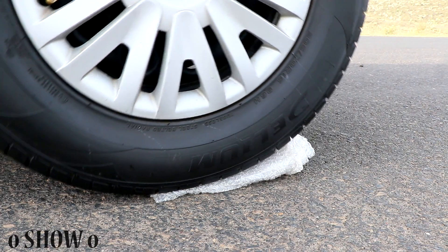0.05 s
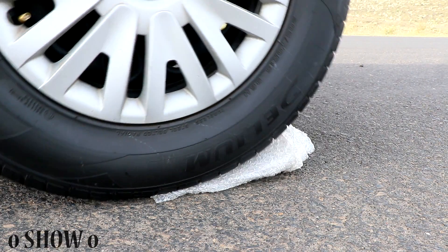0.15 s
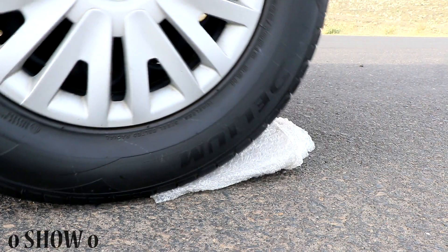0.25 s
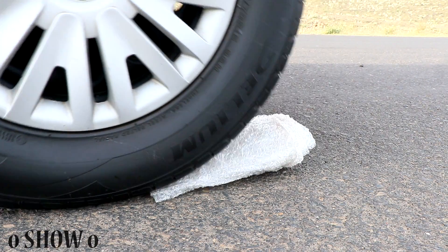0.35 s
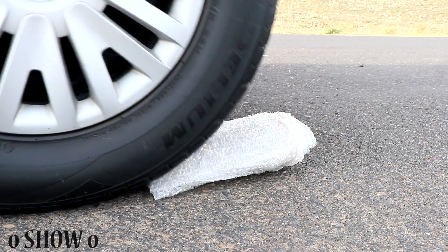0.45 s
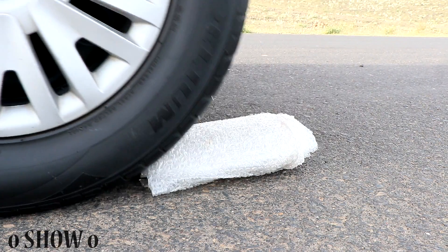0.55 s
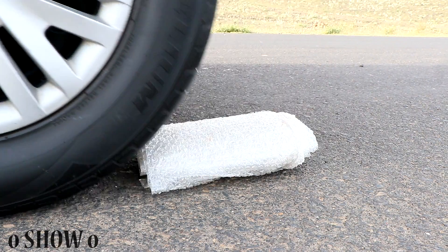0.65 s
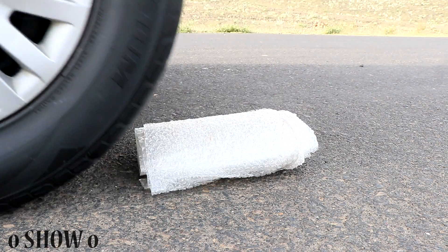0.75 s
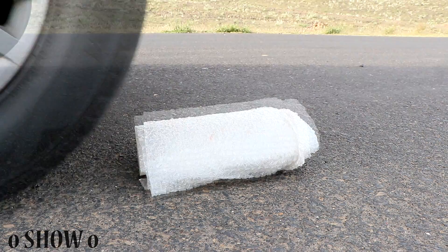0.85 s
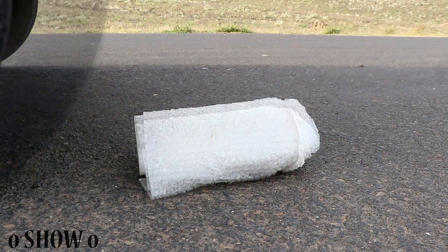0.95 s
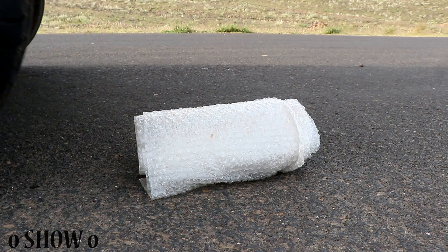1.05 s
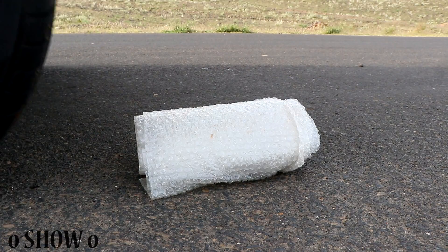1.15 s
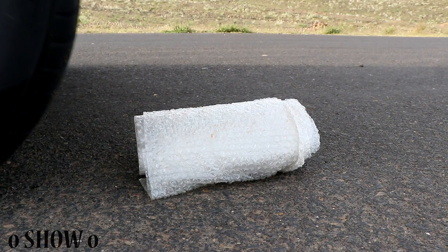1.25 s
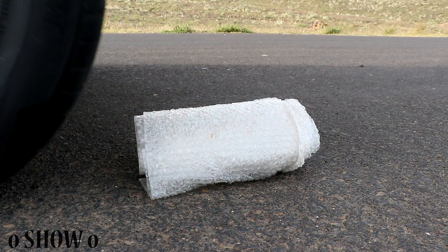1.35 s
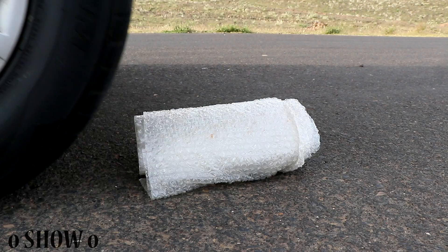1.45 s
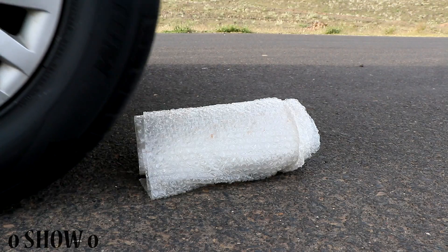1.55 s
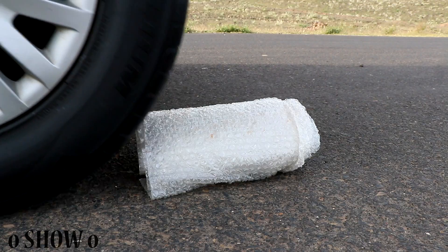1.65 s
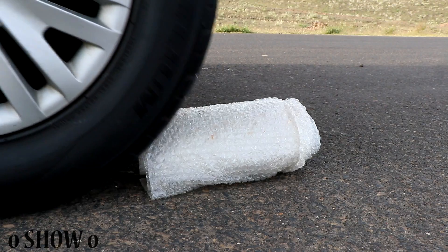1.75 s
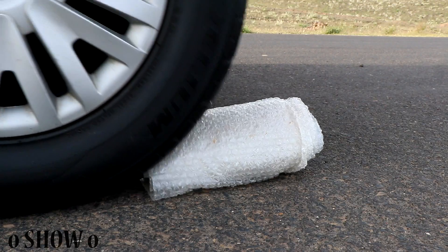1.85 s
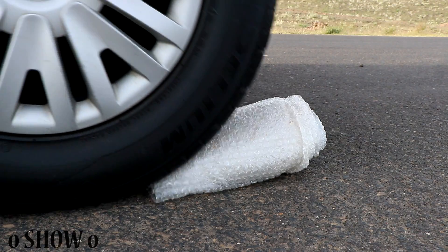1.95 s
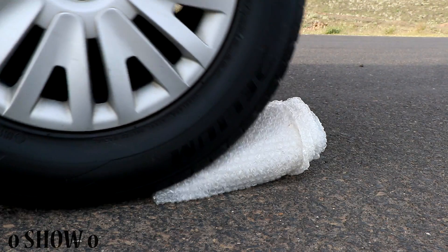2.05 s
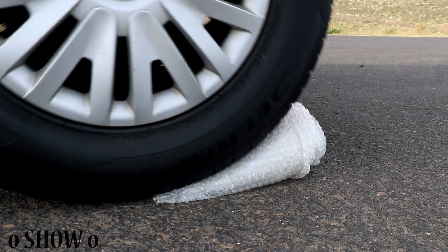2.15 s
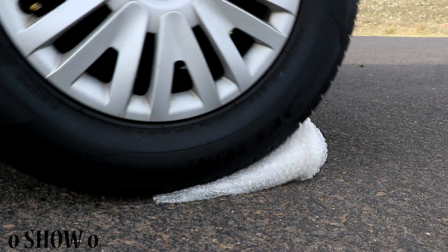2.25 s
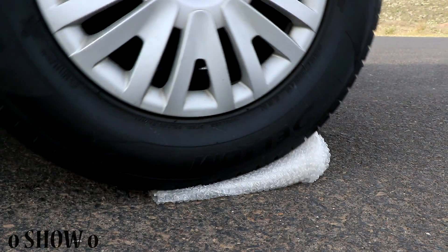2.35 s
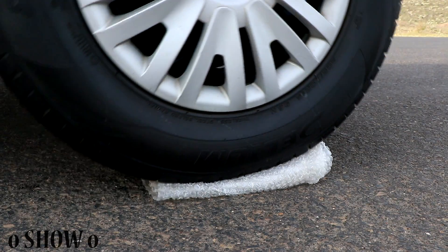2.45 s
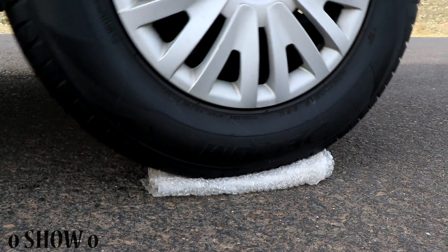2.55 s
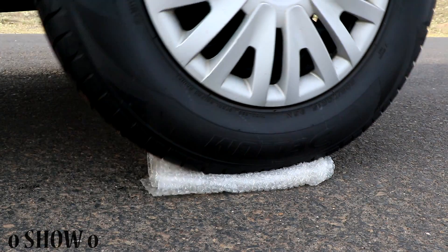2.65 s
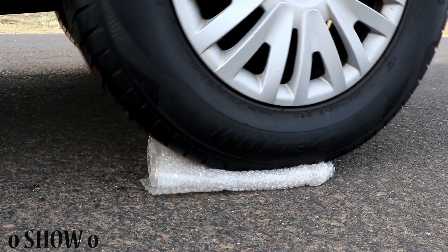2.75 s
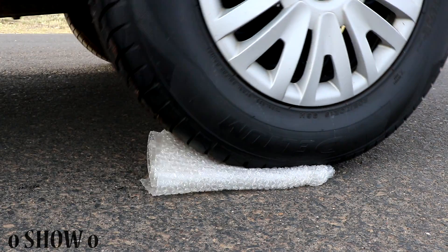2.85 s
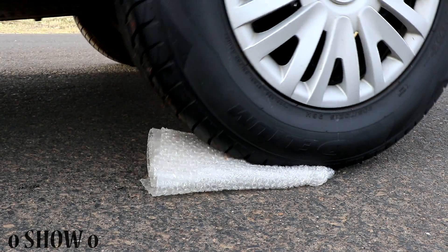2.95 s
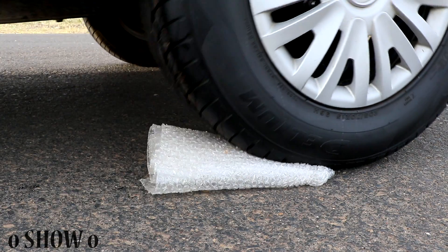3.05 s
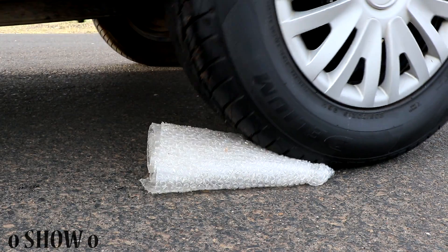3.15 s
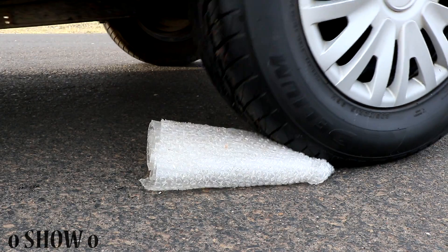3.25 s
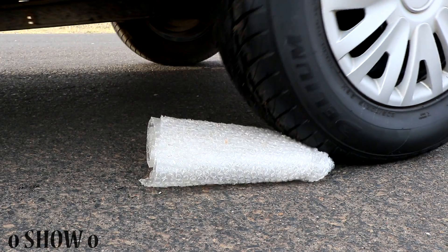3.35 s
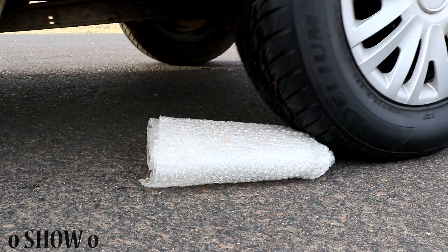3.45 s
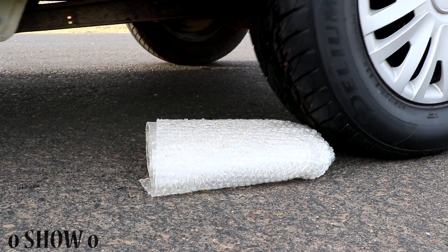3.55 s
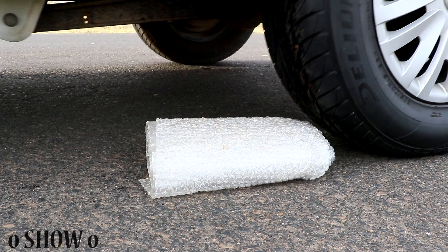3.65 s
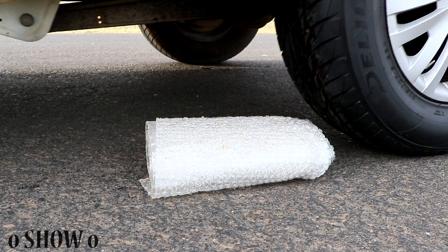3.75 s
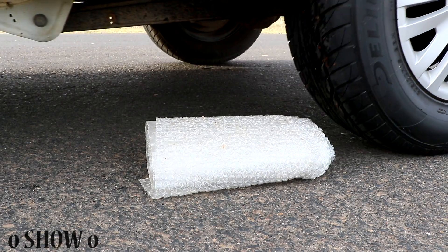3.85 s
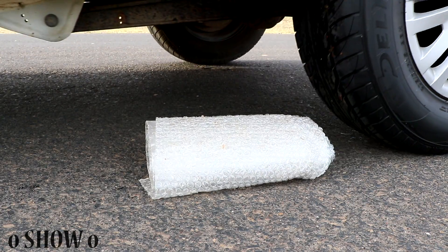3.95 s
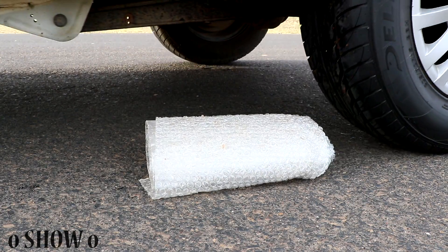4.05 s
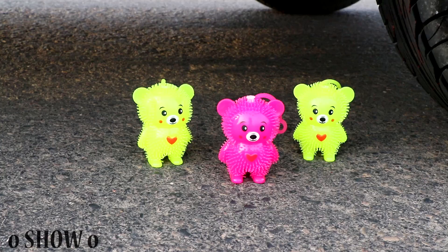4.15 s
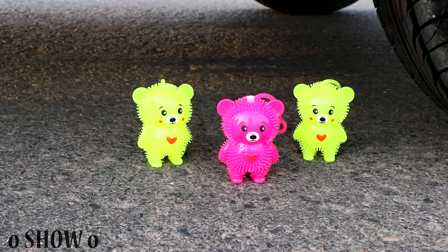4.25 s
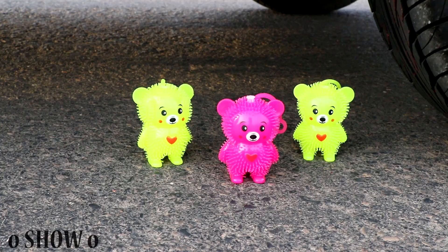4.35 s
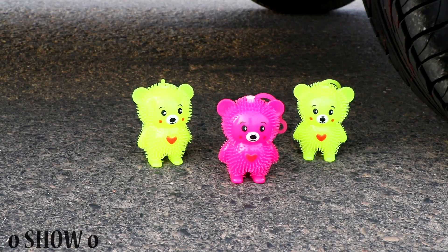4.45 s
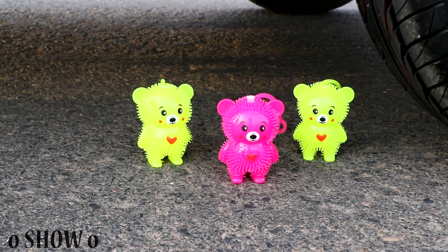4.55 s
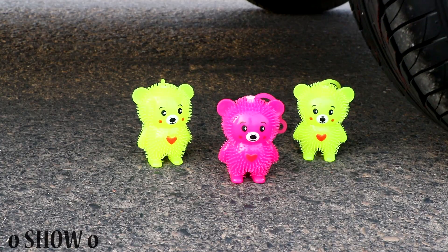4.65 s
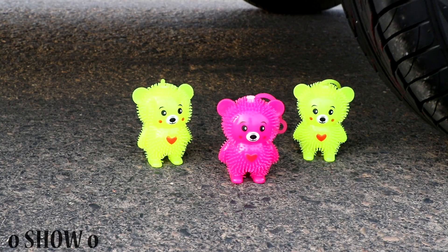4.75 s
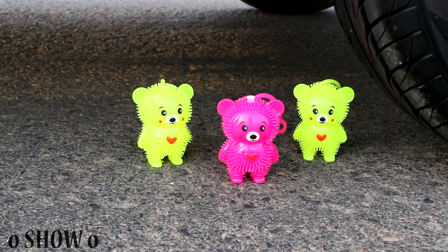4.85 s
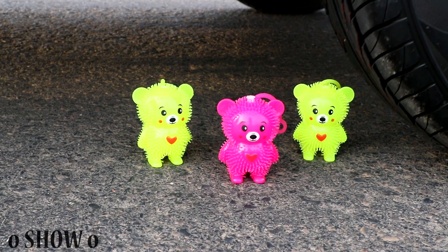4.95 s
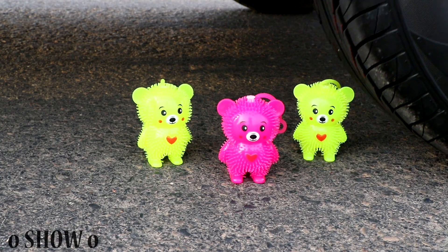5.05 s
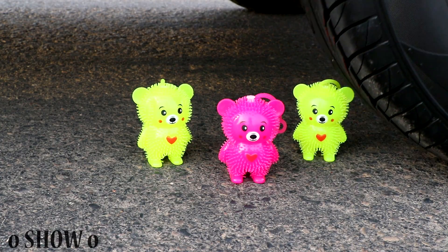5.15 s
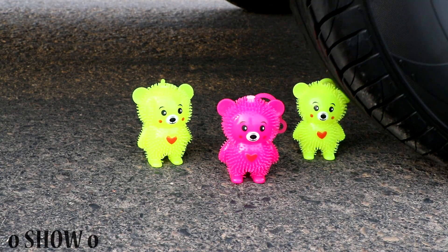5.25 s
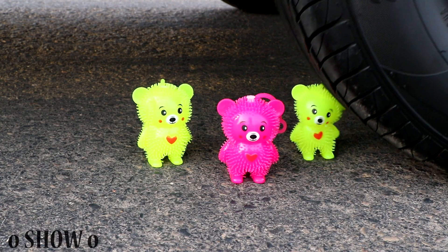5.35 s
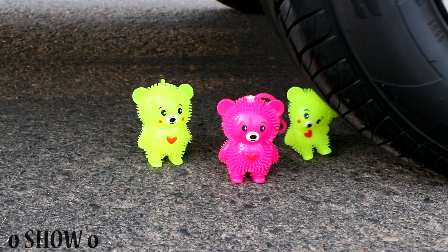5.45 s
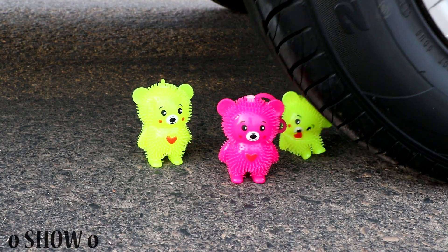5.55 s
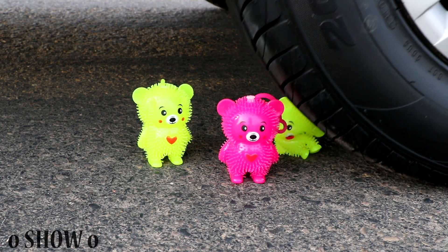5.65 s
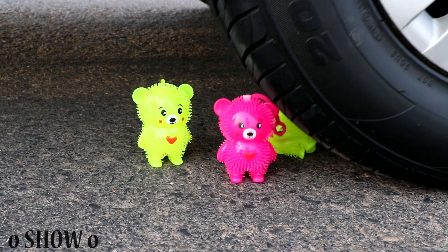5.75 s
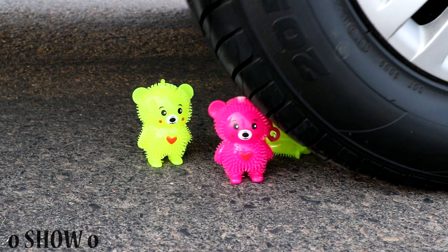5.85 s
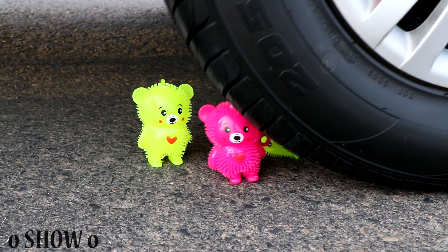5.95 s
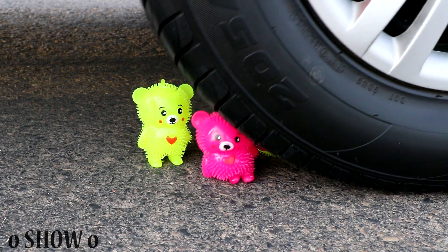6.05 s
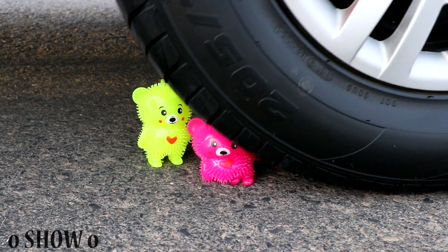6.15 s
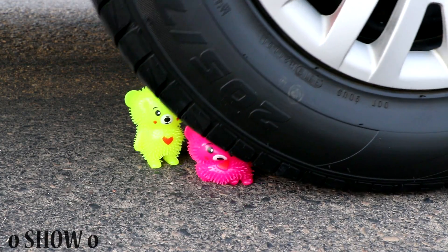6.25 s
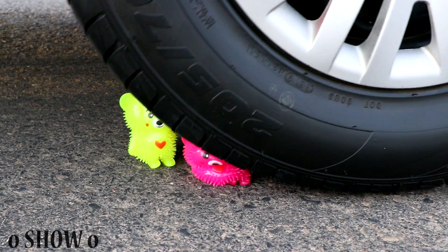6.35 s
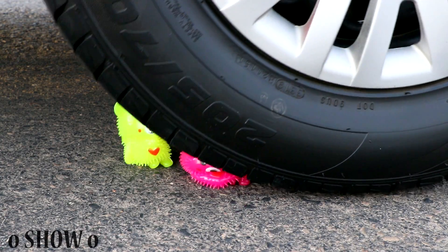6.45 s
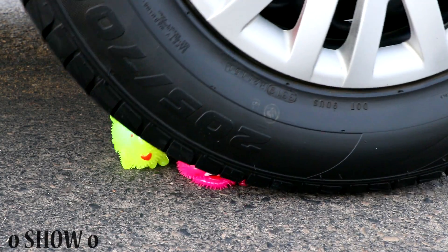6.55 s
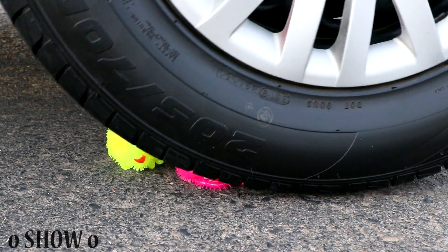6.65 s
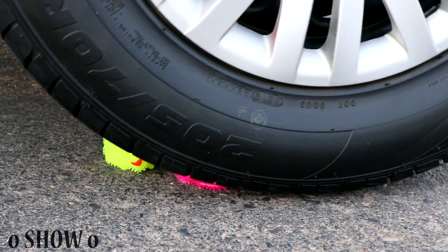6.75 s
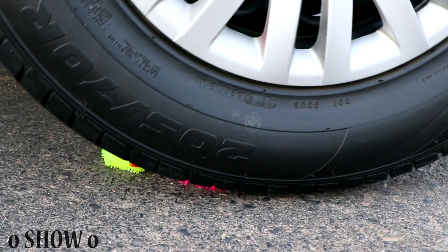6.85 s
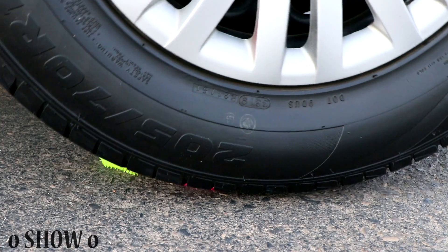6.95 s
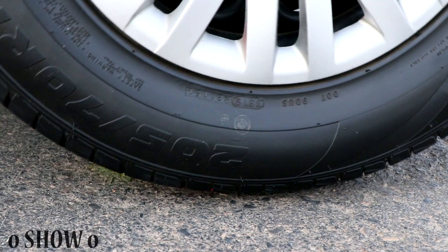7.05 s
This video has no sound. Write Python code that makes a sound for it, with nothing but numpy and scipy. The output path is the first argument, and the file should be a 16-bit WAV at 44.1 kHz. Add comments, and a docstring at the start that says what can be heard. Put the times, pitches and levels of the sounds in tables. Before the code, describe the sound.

A car engine idles quietly throughout, heard outdoors from close to the tyre. Right at the start, bubble wrap gives two sharp pops, followed by a couple of faint ticks. A soft groan of squeezed wrap swells near 2 seconds. From 2.2 to 3.1 seconds the bubbles burst in a rapid, irregular volley with crinkly rubbing; each crack echoes briefly between asphalt and car, and the loudest overload the microphone. Then only the engine remains, with a faint whine and throbbing hiss. At 5.5 seconds a squeaky rubber toy lets out a buzzy, slightly falling wail lasting almost half a second. From 6 to 7 seconds plastic snaps and splinters loudly amid rubber scuffing. Within this, a second toy gives a quick, rough, high rising squeal at 6.2 seconds, and a third a short reedy bleat around 6.6. A brief hiss of air escapes near 6.9 seconds.

```python
"""Bubble wrap pops under the tyre of a car that creeps over it, then over three squeaky rubber toys.
Each bursting bubble is a sharp crack and a short ring of air, amid rubbing that builds and relaxes.
The toys wail, squeal and bleat as their air is pressed out through reeds, and their plastic snaps.
The engine idles quietly, sound echoes between asphalt and car, and the loudest pops overload the mic."""
import sys
import numpy as np
from scipy import signal
from scipy.fft import rfft, irfft, next_fast_len
from scipy.io import wavfile
from scipy.ndimage import map_coordinates

SR = 44100
rng = np.random.default_rng(int(sys.argv[2]) if len(sys.argv) > 2 else 0)


def file_out(sig):
    """Save sig as 16-bit WAV at sys.argv[1]."""
    # one column per channel
    cols = np.atleast_2d(sig).T
    # limit, then scale
    lim = np.clip(cols, -1, 1)
    pcm = np.round(lim * 32767).astype(np.int16)
    wavfile.write(sys.argv[1], SR, pcm)


N = 313551
TIME = np.arange(N) / SR
TOP_HZ = 16000

# Things that break. Each row: start in seconds, level in dB, ring pitch in Hz, echo and rubbing in dB.
BUBBLE_BURSTS = [(0.0116, -9, 1500, -28), (0.0296, 7, 3500, -22), (0.2395, -30, 2200, -60),
                 (0.2995, -28, 1330, -54), (2.1929, -3, 1166, -21), (2.2076, -2.5, 1600, -23),
                 (2.2162, 2, 1660, -21), (2.2453, 3.5, 2480, -24), (2.2687, 3, 1850, -18),
                 (2.2828, -1, 2770, -26), (2.3211, -1, 2516, -21), (2.3845, 1.5, 2200, -20),
                 (2.41, 7, 925, -25), (2.486, -12, 1435, -21), (2.604, -30, 1202, -31),
                 (2.651, -22, 1400, -29), (2.6668, 2, 840, -26), (2.715, 3, 2800, -26),
                 (2.738, 4, 1100, -23), (2.7755, -5, 3940, -29), (2.7865, -9, 1200, -31),
                 (2.8307, 0, 2200, -25), (2.8521, 3, 1720, -14), (2.8614, 6, 1655, -20),
                 (2.9043, -4, 3180, -28), (2.9216, 3, 2090, -23), (2.9368, 0, 1636, -21),
                 (2.9461, 3, 2450, -22), (2.9868, 1, 2890, -18), (2.9913, 5, 2293, -17),
                 (3.0078, 5, 2156, -26), (3.0179, 2, 2055, -20), (3.0199, 9, 2716, -17),
                 (3.0645, 2, 1500, -36), (3.0659, 1, 1750, -35)]
TOY_SNAPS = [(6.0154, 3, 1211, -18), (6.063, 2, 1051, -18), (6.067, 8, 1146, -19), (6.0998, -6, 1500, -31),
             (6.1233, -5, 5320, -29), (6.173, 1, 4287, -21), (6.1817, 2, 1116, -19), (6.1935, -3, 794, -20),
             (6.4337, -10, 2965, -32), (6.4437, 10, 1000, -11), (6.482, 3, 2014, -17),
             (6.4994, 10, 1150, -15), (6.5181, 0, 2220, -21), (6.5229, 3, 1974, -25), (6.559, 2, 3240, -25),
             (6.6041, 1, 1498, -23), (6.6633, 6, 1888, -27), (6.7597, -4, 2237, -21),
             (6.7645, 3, 1075, -22), (6.7908, 1, 1282, -17), (6.8578, -7, 3212, -37),
             (6.9148, -6, 3230, -34), (6.9571, -15, 1284, -40)]
# Tone colours of the wrap and the pops. Each row: frequency in Hz, relative level in dB.
FILM_COLOUR = [(200, -39.5), (420, -17), (700, 4.5), (3000, -7.5), (6000, -17), (10000, -24.5),
               (15500, -26.5)]
GROAN_COLOUR = [(200, -42.5), (550, -15.5), (740, 3), (1000, -23.5), (2500, -30), (8000, -41.5)]
CRACK_COLOUR = [(300, -29), (2500, 12.5), (5500, 7), (9000, -7.5), (16000, -15.5)]
# Reed pitches, which follow the tyre's pressure. Each row: time in seconds, pitch in Hz.
WAIL_PITCH = [(5.48, 955.2), (5.58, 920.2), (5.604, 870.0), (5.618, 876.7), (5.64, 920.3), (5.692, 925.7),
              (5.718, 908.0), (5.762, 908.0), (5.808, 865.1), (5.844, 884.4), (5.88, 859.3)]
BLEAT_PITCH = [(6.545, 945.3), (6.563, 1014), (6.577, 1039), (6.611, 1050), (6.703, 1029), (6.745, 954.1)]
# How each toy's hollow body shapes its tone. Each row: frequency in Hz, relative level in dB.
WAIL_BODY = [(900, 4.5), (1800, -2), (2800, -3), (3700, 1), (4600, 1.5), (5500, -3.5), (6400, -4.5),
             (7400, -11.5), (8300, -13), (9200, -16.5), (10200, -27.5), (12500, -41), (15500, -51)]
SQUEAL_BODY = [(2400, 0.5), (5500, -3), (7500, -8), (9700, -4), (10500, -29), (15000, -31.5)]
BLEAT_BODY = [(1030, -4), (2080, -12.5), (3100, -10.5), (4150, -7.5), (5200, 1), (6250, -8), (7300, -6.5),
              (8300, -11.5), (9400, -26), (11000, -37.5), (15000, -38)]
# Tone colours of the toys' air and rubber. Each row: frequency in Hz, relative level in dB.
REED_AIR_COLOUR = [(2800, -22), (4200, 0), (7500, -2), (10000, -14), (15000, -26)]
LEAK_COLOUR = [(300, -22.5), (5500, 4), (13500, -6.5), (15700, -0.5)]
RUBBER_COLOUR = [(80, -31.5), (350, -5), (800, 1.5), (2300, -0.5), (9000, -15.5), (15500, -23)]
# Tone colours of the car and the echo under it. Each row: frequency in Hz, relative level in dB.
RUMBLE_COLOUR = [(22, 1), (50, -8), (80, -9), (120, -21), (300, -45.5)]
ENGINE_COLOUR = [(50, -6), (250, 1), (400, 1), (1000, 1), (2500, -14), (6000, -41.5), (14000, -62)]
VALVE_COLOUR = [(500, -17.5), (1500, -3), (3300, -2), (4200, -9), (10000, -26), (15000, -36.5)]
ECHO_COLOUR = [(100, -23.5), (400, -0.5), (800, 10), (3500, 2.5), (6000, 1.5), (15000, -10.5)]
# Swells of engine whine. Each row: start in seconds, end in seconds, pitch in Hz, level in dB.
WHINE_SWELLS = [(0, 2.2, 385, -70), (1.35, 1.8, 331.5, -62), (2.2, 4.25, 388, -60),
                (4.1, 7.8, 324.6, -63.5), (4.4, 5, 391, -57.5), (5.05, 5.9, 391, -60.5)]
# The wheel rolls past and uncovers the engine. Each row: time in seconds, share uncovered from 0 to 1.
ENGINE_UNCOVERED = [(2.25, 0), (3.35, 1)]


def bubble_wrap(tread_hz=11, crease_db=-13, muffle_hz=1800):
    """The roll groans, creases and bursts under the tread, which muffles it for a moment."""
    groan = noise(GROAN_COLOUR) * envelope(start=1.1, attack=1, hold=.05, release=.4, db=-47)
    groan *= amp(1.5 * wobble(25) - 3.5 * np.cos(2 * np.pi * tread_hz * TIME))
    rubbing = strain(BUBBLE_BURSTS, build_s=.009, relax_s=.023)
    creases = amp(crease_db) * rubbing * crackle(FILM_COLOUR, per_second=1200)
    # the last air is driven into the end of the roll
    last_bubbles = flurry(start=2.93, end=3.03, db=-4, hz=2400, echo_db=-29)
    bursts = pops(BUBBLE_BURSTS + last_bubbles, ring_cycles=1.3, crack_db=0, crack_s=.00037,
                  low_cut_hz=560, knock_hz=865, knock_s=.0008, sideways_db=-1)
    wrap = groan + creases + bursts
    treble = wrap - signal.sosfiltfilt(signal.butter(2, muffle_hz, fs=SR, output="sos"), wrap)
    blocked_share = envelope(start=2.41, attack=.08, hold=.14, release=.1, db=-2.5)
    return wrap - blocked_share * treble


def pops(table, ring_cycles, crack_db, crack_s, low_cut_hz, knock_hz, knock_s, sideways_db):
    """Each pop is a sharp crack, a few cycles of ringing air and a knock of the tyre, plus its echo."""
    out = np.zeros(N + SR)
    t = np.arange(SR // 30) / SR
    bass_cut = signal.butter(2, low_cut_hz, "high", fs=SR, output="sos")  # small things give little bass
    for start, db, hz, echo_db in table:
        ring = -amp(db) * np.sin(2 * np.pi * hz * t) * np.exp(-t * hz / ring_cycles)
        knock_pitch = knock_hz * np.exp(rng.normal(0, .25))
        knock = amp(db - 13) * np.sin(2 * np.pi * knock_pitch * t) * np.exp(-t / knock_s)
        # the crack grows faster than the ring, and is sharper for small, high-pitched air pockets
        sharp_db = 1.25 * db + 3 * np.log2(hz / 2000)
        crack = coloured(rng.standard_normal(len(t)) * np.exp(-t / crack_s), CRACK_COLOUR)
        crack = amp(sharp_db + crack_db) * unit(crack) / np.sqrt(len(t))
        pop = signal.sosfilt(bass_cut, ring + knock + crack)
        # the burst also leaves sideways and returns from under the car
        sideways = coloured(signal.unit_impulse(len(t)), FILM_COLOUR)
        tail = signal.fftconvolve(unit(pop), echo())
        tail += amp(sideways_db) * signal.fftconvolve(unit(sideways), echo())
        tail *= amp(echo_db) / np.std(tail[:SR // 70])
        first = round(start * SR)
        out[first:first + len(t)] += pop
        out[first:first + len(tail)] += tail
    return out[:N]


def flurry(start, end, db, hz, echo_db, count=7):
    """Extra table rows for small pops of random time, strength and pitch."""
    return [(start + when * (end - start), db + 8 * (strength - .5), hz * 2 ** (pitch - .5), echo_db)
            for when, strength, pitch in rng.random((count, 3))]


def strain(table, build_s, relax_s):
    """Loudness of the rubbing that builds up before each pop and relaxes after it."""
    power = np.zeros(N)
    for start, _, _, db in table:
        near = np.abs(TIME - start) < .5
        lag = TIME[near] - start
        power[near] += amp(db) ** 2 * np.exp(np.minimum(lag / build_s, -lag / relax_s))
    return np.sqrt(power)


def crackle(colour, per_second):
    """Countless tiny creases of unequal size, blurred by reflections off road and tyre."""
    sizes = amp(6 * np.minimum(rng.exponential(size=N), 3)) * rng.choice([-1, 1], N)
    ticks = sizes * (rng.random(N) < per_second / SR)
    t = np.arange(SR // 40) / SR
    blur = rng.standard_normal(len(t)) * np.exp(-t / .006)
    reflections = signal.fftconvolve(ticks, blur / np.linalg.norm(blur))[:N]
    return unit(coloured(ticks / 2 + reflections, colour))


def squeaky_toys(air_db=-29, echo_db=-14):
    """Three toys give up their air one after another; breath hisses through the first one's reed."""
    wail, wail_level = wailing_toy()
    toys = wail + squealing_toy() + bleating_toy()
    toys += amp(air_db) * wail_level * noise(REED_AIR_COLOUR)
    tail = signal.fftconvolve(toys, echo(near_s=.038, far_s=.3, far_db=-28.5))[:N]
    return toys + amp(echo_db) * tail


def wailing_toy(emptying_db_per_s=9):
    """The first toy's shrinking hollow passes ever higher overtones. Returns its sound and loudness."""
    age = np.clip(TIME - 5.473, 0, 1)
    edge_hz = 3250 + 3150 * age
    # the reed jumps to a shriller buzz, then its air is briefly pinched off
    shrill_db = 20 * np.log10(1 + envelope(start=5.708, attack=.004, hold=.05, release=.25, db=8))
    pinched_share = envelope(start=5.775, attack=.03, hold=.012, release=.08, db=-4.5)

    def body_db(harmonic, hz, on):
        """The body's colour: weak below the rising edge, brighter above it, with one shrill band."""
        below_edge = (1 - np.tanh((hz - edge_hz[on]) / 300)) / 2
        octaves_above = np.log2(np.maximum(hz / edge_hz[on], 1))
        band_db = (shrill_db[on] - 3) * np.exp(-((hz - 5750) / 1200) ** 2)
        return colour_db(WAIL_BODY, hz) + 2.5 * octaves_above - 24 * below_edge + band_db

    pitch = curve(WAIL_PITCH)
    level = envelope(start=5.473, attack=.006, hold=.385, release=.05, db=-9.6) * pressed(pitch)
    level *= (1 - pinched_share) * amp(.4 * shrill_db - emptying_db_per_s * age)
    return reed(pitch, level, body_db, jitter=.0007, flutter_db=1.5, rasp=.0073, harmonics=18), level


def squealing_toy(from_hz=2420, to_hz=6300, climb_s=.087):
    """The middle toy's rough squeal climbs quickly, then levels off."""
    def body_db(harmonic, hz, on):
        """The body's colour, with the overtones turned down."""
        return colour_db(SQUEAL_BODY, hz) - 10 * min(harmonic - 1, 2)

    pitch = to_hz - (to_hz - from_hz) * np.exp(-np.maximum(TIME - 6.222, 0) / climb_s)
    level = envelope(start=6.193, attack=.042, hold=.028, release=.19, db=-14.5)
    return reed(pitch, level, body_db, jitter=.011, flutter_db=4.5, rasp=.24, harmonics=4)


def bleating_toy():
    """The last toy's short bleat rises and falls with the tyre's pressure."""
    pitch = curve(BLEAT_PITCH)
    level = envelope(start=6.522, attack=.04, hold=.137, release=.115, db=-15.2) * pressed(pitch)
    return reed(pitch, level, lambda harmonic, hz, on: colour_db(BLEAT_BODY, hz),
                jitter=.00066, flutter_db=1.6, rasp=.015, harmonics=15)


def reed(pitch, level, body_db, jitter, flutter_db, rasp, harmonics):
    """A buzzing reed: tones at whole multiples of an unsteady pitch, shaped by the toy's hollow body."""
    on = level > 1e-4
    pitch = (pitch * (1 + jitter * wobble(160)))[on]
    phase = 2 * np.pi * np.cumsum(pitch) / SR + rasp * wobble(900)[on]
    tone, power = 0, 1e-12
    for harmonic in range(1, harmonics + 1):
        hz = harmonic * pitch
        gain = amp(body_db(harmonic, hz, on) + flutter_db * wobble(28)[on]) * (hz < TOP_HZ)
        tone += gain * np.sin(harmonic * phase + rng.uniform(0, 2 * np.pi))
        power += gain ** 2 / 2
    out = np.zeros(N)
    out[on] = tone / np.sqrt(power) * level[on]
    return out


def pressed(pitch, db_per_octave=44):
    """Loudness of a reed from its pitch: more pressure makes it both higher and louder."""
    return amp(db_per_octave * np.log2(pitch / pitch.max()))


def crushed_toys(scuff_db=-13):
    """Rubber scuffs, plastic parts snap and splinter, and the last air hisses out."""
    leak = noise(LEAK_COLOUR) * envelope(start=6.8, attack=.065, hold=.055, release=.05, db=-32)
    rubbing = strain(TOY_SNAPS, build_s=.006, relax_s=.026)
    scuff = amp(scuff_db) * rubbing * crackle(RUBBER_COLOUR, per_second=600)
    splinters = flurry(start=6.5, end=6.73, db=-7, hz=2600, echo_db=-30)
    snaps = pops(TOY_SNAPS + splinters, ring_cycles=1.2, crack_db=6, crack_s=.0013,
                 low_cut_hz=230, knock_hz=521.4, knock_s=.00242, sideways_db=-3.5)
    return leak + scuff + snaps


def idling_car(firing_hz=27, chirp_hz=2390):
    """The engine rumbles and whines; valve hiss and a faint chirp throb with its firing."""
    uncovered = curve(ENGINE_UNCOVERED)
    rumble_db = np.interp(uncovered, [0, 1], [-57.5, -74.5])
    engine_db = np.interp(uncovered, [0, 1], [-62.2, -61.7])
    valve_db = np.interp(uncovered, [0, 1], [-71.5, -64.3])
    rumble = noise(RUMBLE_COLOUR) * amp(rumble_db + 2.5 * wobble(8.5))
    engine = noise(ENGINE_COLOUR) * amp(engine_db + .89 * wobble(6))
    throb = np.sin(2 * np.pi * firing_hz * TIME)
    valves = noise(VALVE_COLOUR) * amp(valve_db + 2.5 * throb)
    chirp = np.sin(2 * np.pi * chirp_hz * TIME + 1.5 * wobble(90))
    chirp *= envelope(start=3.1, attack=.4, hold=.65, release=.3, db=-66) * amp(5 * throb)
    whine = 0
    for start, end, hz, db in WHINE_SWELLS:
        progress = np.clip((TIME - start) / (end - start), 0, 1)
        swell = np.abs(np.sin(np.pi * progress)) ** .5 * amp(db + 2.5 * wobble(7.1))
        whine += swell * np.sqrt(2) * np.sin(2 * np.pi * hz * TIME + wobble(27))
    return rumble + engine + valves + chirp + whine


def echo(near_s=.049, far_s=.27, far_db=-17, onset_s=.002):
    """Dense reflections between road and car floor, then a weaker, longer outdoor tail."""
    t = np.arange(SR // 3) / SR
    decay = amp(-60 * t / near_s) + amp(far_db - 60 * t / far_s)
    fade_in = 1 - np.exp(-(t / onset_s) ** 2)
    tail = coloured(rng.standard_normal(len(t)), ECHO_COLOUR) * decay * fade_in
    return tail / np.linalg.norm(tail)


def envelope(start, attack, hold, release, db):
    """Loudness that rises 40 dB in the attack, holds, then falls 60 dB per release; times in seconds."""
    rise = np.minimum((TIME - start) / attack - 1, 0)
    fall = np.maximum(TIME - start - attack - hold, 0) / release
    return amp(db + np.maximum(40 * rise - 60 * fall, -200))


def wobble(per_second):
    """A smooth curve through this many random values a second."""
    values = rng.standard_normal(int(N * per_second / SR) + 4)
    coarse_time = np.arange(0, N + 32, 32) / SR
    return np.interp(TIME, coarse_time, map_coordinates(values, [coarse_time * per_second]))


def noise(colour):
    """Steady noise with the given tone colour and an average power of 1."""
    return unit(coloured(rng.standard_normal(N), colour))


def coloured(x, colour):
    """Filters a sound to give it a tone colour."""
    size = 2 * next_fast_len(len(x) // 2 + 1024)
    cepstrum = irfft(np.log(amp(colour_db(colour, np.fft.rfftfreq(size, 1 / SR)))))
    # folding onto the first half makes the filter ring only after a sound, never before it
    cepstrum[1:size // 2] *= 2
    cepstrum[size // 2 + 1:] = 0
    return irfft(rfft(x, size) * np.exp(rfft(cepstrum)))[:len(x)]


def colour_db(colour, hz):
    """The level of a tone colour at any frequency, read between its rows."""
    row_hz, row_db = np.transpose(colour)
    return np.interp(np.log(hz + 1), np.log(row_hz + 1), row_db)


def curve(rows):
    """Joins rows of time and value with straight lines, giving one value per sample."""
    return np.interp(TIME, *np.transpose(rows))


def amp(db):
    """Turns decibels into a multiplier."""
    return 10 ** (np.asarray(db) / 20)


def unit(x):
    """Scales a sound to an average power of 1."""
    return x / np.sqrt(np.mean(x ** 2) + 1e-20)


def scene():
    """Wrap, toys and car, heard at one close microphone."""
    return (bubble_wrap() + crushed_toys() + squeaky_toys() + idling_car())[None]


def record(dry):
    """The loudest pops overload the microphone and flatten; nothing above TOP_HZ is kept."""
    clipped = dry / (1 + np.abs(dry) ** 8) ** (1 / 8)
    size = next_fast_len(N + SR // 2)
    kept = np.fft.rfftfreq(size, 1 / SR) < TOP_HZ
    return irfft(rfft(clipped, size) * kept, size)[..., :N]


dry = scene()
out = record(dry)
file_out(out)
```